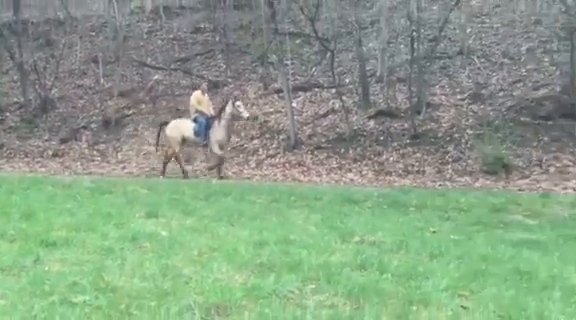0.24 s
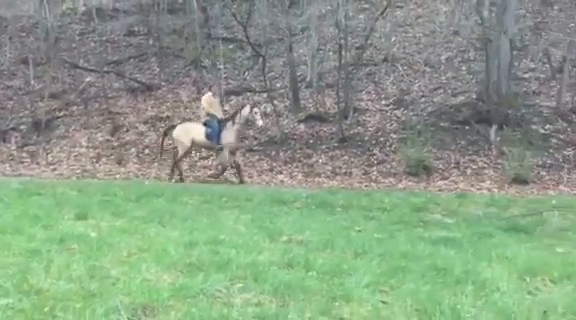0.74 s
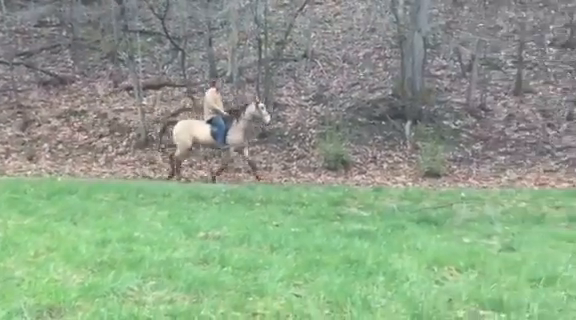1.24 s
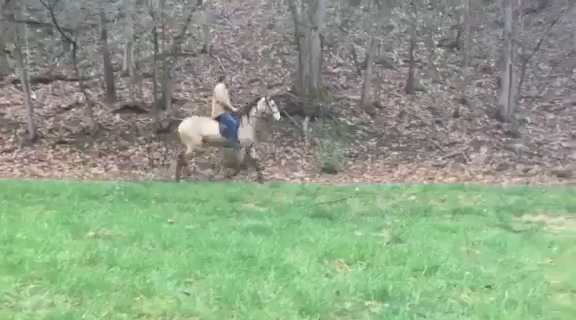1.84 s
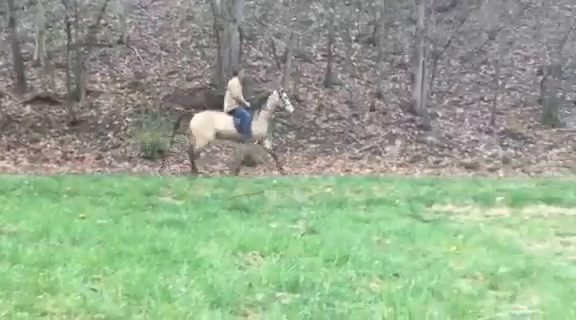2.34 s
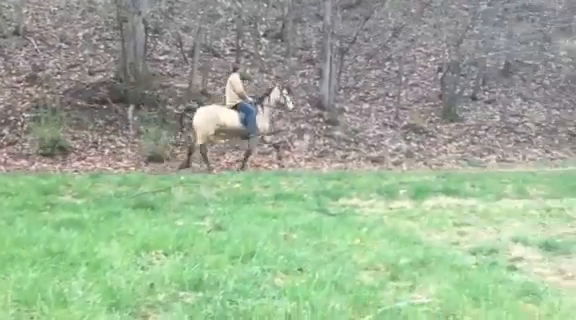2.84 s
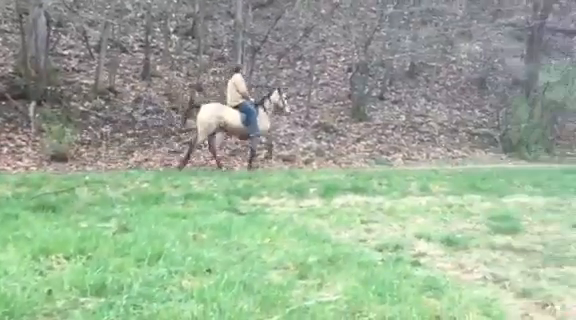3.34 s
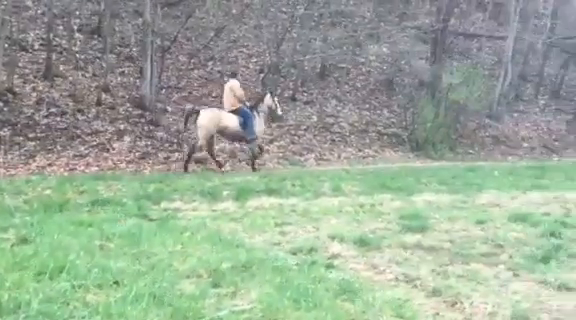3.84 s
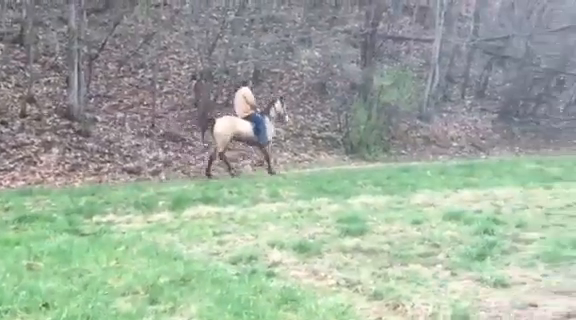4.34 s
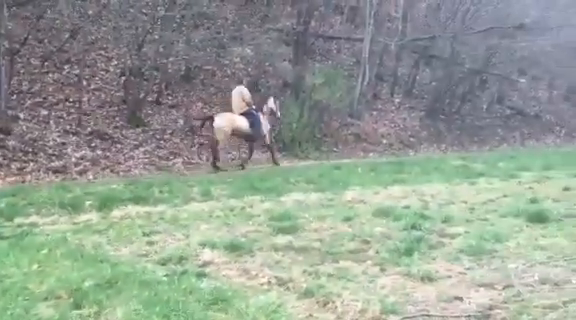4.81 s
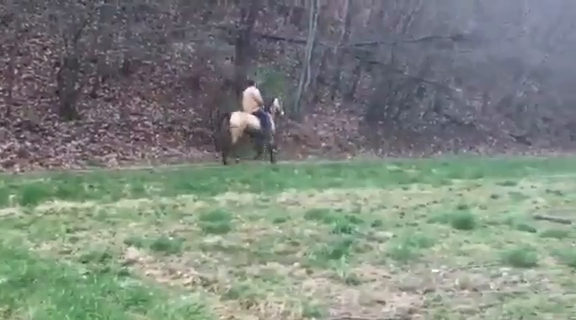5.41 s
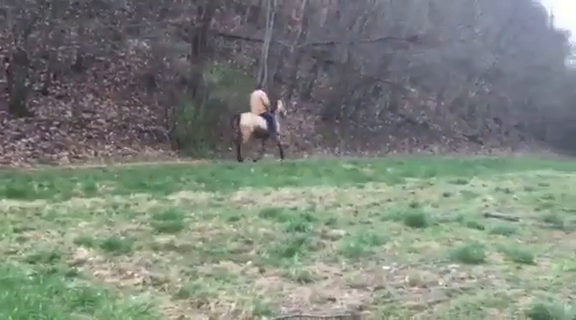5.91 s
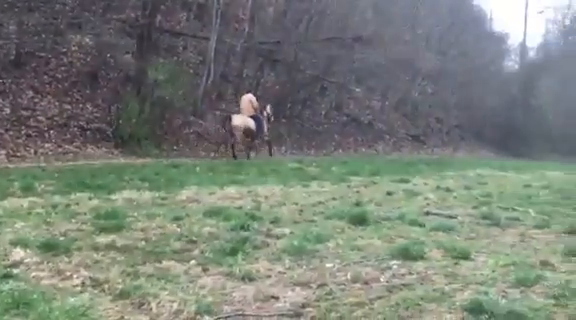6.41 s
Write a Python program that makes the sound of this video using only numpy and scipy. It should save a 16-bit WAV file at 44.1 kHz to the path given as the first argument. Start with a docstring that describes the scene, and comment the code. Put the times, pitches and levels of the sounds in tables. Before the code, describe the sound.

Across an open meadow, a horse's hooves step briskly along a leafy dirt trail: crisp snaps and crunches, soft stony clops, dull soil thumps and small pebble knocks. Quiet woods hiss and murmur behind. Wind is barely noticeable at first, then from the middle it hits the microphone with deep, fluttering buffets, while the steps grow duller as the horse moves away. Mono, distant outdoor pickup.

```python
"""Hooves tread a leaf-strewn dirt trail some way off across a meadow, from the start and all through.
Leaves snap and crunch as coloured noise and tiny ticks; stones clop, low thumps and pebbles knock as
short two-mode rings with a noisy scuff. Over the steps the top treble thins as the horse draws away.
Faint gusts brush the microphone from the start and buffet it strongly from halfway: low resonant
noise, flutter, slaps, thumps. Woods murmur and hiss throughout: filtered noise with a faint whine."""
import sys
import numpy as np
from scipy import signal
from scipy.io import wavfile
from scipy.ndimage import uniform_filter1d

SR = 44100
rng = np.random.default_rng(int(sys.argv[2]) if len(sys.argv) > 2 else 0)


def int16_out(signal):
    """Quantize to a 16-bit WAV file."""
    q = np.round(np.clip(np.atleast_2d(signal).T, -1, 1) * 32767)
    wavfile.write(sys.argv[1], SR, q.astype(np.int16))


N = 293706


CRUNCH_RISE_S = 0.0047
LITTER_HZ, LITTER_SPREAD = 3070, 0.15  # median patch resonance; spread in log Hz
FADE_DB_PER_S = 2  # top treble loss as the horse draws away

# Hooves crushing leaves. Each row: start in seconds, snap level in dB and crunch level in dB before
# the band gains, crunch length in seconds, middle treble gain in dB, top treble gain in dB before the fade.
CRUNCHES = [(.046, -25.5, -41, 0.061, -4, -15), (0.17, -38, -43.5, 0.031, -6, -11),
            (0.327, -40, -50.5, .016, -8, -13), (.381, -44.5, -54, 0.019, 6.5, 6.5),
            (0.448, -45, -44, .028, -14, -26), (0.609, -68, -52.5, .045, -1.5, -8),
            (0.701, -59, -54.5, 0.041, -5, -13), (.875, -61, -51, 0.015, 0, -9),
            (.915, -50, -60.5, 0.074, 5.5, 1), (.946, -20.5, -42.5, 0.038, 1, -15),
            (.999, -34, -50.5, 0.038, -15, -27), (1.106, -59, -55, 0.0086, 6.5, 8.5),
            (1.175, -38.5, -54, 0.028, -3.5, -19), (1.272, -56, -55.5, 0.03, -3, -11),
            (1.284, -36, -54.5, 0.028, -4, -4.5), (1.417, -52, -41.5, 0.019, -1.5, -6),
            (1.438, -50, -54, .037, 7, 4), (1.477, -35.5, -60, 0.02, -1, -15),
            (1.561, -60, -56.5, 0.022, -3.5, -2), (1.682, -74, -58.5, 0.0071, -1, 6),
            (1.707, -67, -57, 0.14, 0, -6), (1.765, -23.5, -46, 0.05, -4.5, -2.5),
            (1.828, -55, -57, 0.021, -8, -10), (1.978, -31.5, -44.5, 0.042, -2, -1),
            (2.011, -31.5, -47.5, 0.013, -11, 1), (2.13, -51, -53, 0.041, 0.5, -4),
            (2.173, -60, -51, .019, -20, -22), (2.25, -27.5, -40.5, 0.036, -1, -16),
            (2.362, -36, -44, 0.038, -2, -5), (2.53, -38, -49.5, 0.031, -4.5, -1),
            (2.598, -37.5, -50.5, 0.034, -0.5, 0), (2.633, -37, -43, 0.035, -2.5, -5),
            (2.653, -34, -49, 0.028, -4, -4), (2.796, -36.5, -44, 0.028, -1.5, 0.5),
            (2.816, -50, -54, 0.029, -3, 7), (2.923, -46, -45.5, 0.027, -1.5, -26),
            (3.073, -67, -54.5, 0.029, 3, -25), (3.082, -27.5, -49.5, 0.024, -13.5, -29),
            (3.201, -58, -48, 0.023, -9, -12), (3.305, -72, -64, .014, -8, -16),
            (3.349, -69, -52.5, 0.016, 5, -1), (3.488, -31, -46.5, 0.022, 3.5, -8),
            (3.672, -82, -53, 0.02, -32, -24), (3.729, -47, -63.5, 0.034, 9.5, 13.5),
            (3.755, -47, -52, 0.023, -13, -2), (3.876, -71, -62, .015, -11, -10),
            (3.917, -73, -53, 0.011, -1, 6), (4.024, -36, -44, 0.019, -6, -12),
            (4.13, -51, -59, 0.032, -21, -22), (4.165, -62, -53, 0.02, -14, -16),
            (4.254, -42.5, -63, 0.047, -2.5, 4), (4.307, -31.5, -45.5, 0.025, -12, -5.5),
            (4.439, -74, -54, 0.036, -10, -16), (4.449, -38, -66, .023, -5, -17),
            (4.671, -66.5, -49, 0.018, -35, -30), (4.709, -67, -40, .016, -26, -6),
            (4.733, -42, -62, 0.086, 5, 10), (4.769, -29.5, -42, 0.02, -14, -27),
            (4.789, -40, -55, 0.033, 4, 7), (4.971, -65, -49, 0.032, -16, -13),
            (4.988, -36.5, -55, 0.027, 2.5, -16), (5.04, -59, -59, .024, -26, -27),
            (5.106, -44, -49, 0.03, -6, -11), (5.115, -57, -56, .017, -18, -20),
            (5.254, -60, -62, .042, -8, -20), (5.266, -29.5, -45, .046, -12.5, -10),
            (5.318, -48, -56, 0.04, 9, 7), (5.335, -41.5, -52, 0.014, -7, 0),
            (5.394, -56, -56, 0.019, -12, -11), (5.51, -60, -67, 0.021, -22, -20),
            (5.54, -69, -61, 0.038, -6, -18), (5.614, -36, -54.5, 0.031, -8, -23),
            (5.655, -57, -53, 0.038, -0.5, -5), (5.813, -26.5, -46.5, 0.032, -7.5, -11),
            (5.941, -55, -50, 0.033, -2.5, -7), (5.963, -30, -57, 0.023, -9, -28),
            (6.085, -60, -52, 0.025, -17, -32), (6.097, -27.5, -44.5, 0.069, -4, -22),
            (6.371, -26, -46.5, 0.043, -5, -27), (6.498, -65, -54, 0.027, -13, 1)]


def leaves(tail_db=-17, tail_s=0.065, colour_db=-4.0):
    """A crack and short snap, then a bed of tiny fractures that lasts while the hoof presses down."""
    clumps = gain_of(3 * drift(120))
    rustle = evened(patchy(rng.standard_normal(N), 3.5) * clumps)
    ticks = fractures(per_s=1200, spread_db=6.5, width_hz=330)
    grit = three_bands(evened(rustle + 0.42 * ticks))
    splinter = three_bands(steadied(rng.standard_normal(N), .0005))
    out, t = np.zeros(N), np.arange(SR // 3) / SR
    crack = np.exp(-(t / .0004) ** 2)
    snap = crack + .45 * np.tanh(t / .001) * np.exp(-(t / .0045) ** 2)
    patch_hz = LITTER_HZ * np.exp(LITTER_SPREAD * rng.standard_normal((len(CRUNCHES), 1)))
    for (s, snap_db, crunch_db, length_s, middle_db, top_db), hz in zip(CRUNCHES, patch_hz):
        press = np.exp(-(t / max(length_s, .004)) ** 1.48)
        press += gain_of(tail_db) * np.exp(-t / tail_s)  # leaves settle afterwards
        press *= gain_of(crunch_db) * np.tanh(t / CRUNCH_RISE_S)
        at = slice(round(s * SR), round(s * SR) + len(t))
        snapped = band(gain_of(snap_db) * snap * splinter[:, at], 1140, "high")
        low, middle, top = snapped + press * grit[:, at]
        litter = low + gain_of(middle_db) * middle + gain_of(top_db - FADE_DB_PER_S * s) * top
        patch = resonate(low + middle, hz, width_hz=750)
        add(out, s, litter + gain_of(colour_db) * patch)
    return out


def fractures(per_s, spread_db, width_hz):
    """Tiny breaks of very different sizes, each leaf shard ticking at one of 12 pitches."""
    breaks = rng.random(N) < per_s / SR
    sizes = gain_of(spread_db * np.minimum(rng.exponential(1, N), 4)) * breaks
    shard, pitches_hz = rng.integers(0, 12, N), np.geomspace(1500, 14000, 12)
    total = np.zeros(N)
    for k, hz in enumerate(pitches_hz):
        total += evened(resonate(sizes * (shard == k), hz, width_hz)) * np.sqrt(hz)
    return evened(total)


# Leaf litter spectrum. Each row: frequency in Hz, density in dB per Hz.
LITTER_SPECTRUM = [(500, -24), (900, -50), (1300, -8), (1950, -2), (2500, 1), (3200, 3.5), (4100, 1.5),
                   (6000, 4.5), (8900, 7.5), (10500, 4.5), (11600, 8.5), (15500, 7.5)]


def three_bands(x):
    """Colours x as leaf litter and splits it at 4500 and 9000 Hz: low, middle and top treble."""
    x = coloured(x, LITTER_SPECTRUM)
    under_low, under_top = smooth_low(x, 4500), smooth_low(x, 9000)
    bands = [under_low, under_top - under_low, x - under_top]
    return np.pad(bands, ((0, 0), (0, SR)), "wrap")  # spare second for late events


# Hoof wall on stones. Each row: start in seconds, level in dB, ring in Hz,
# scuff against the level in dB, time to the force peak in seconds.
CLOPS = [(0.04, -47.5, 1693, -10, 0.0038), (0.168, -54.5, 1400, -1.5, 0.0056),
         (0.278, -53, 1073, -27, 0.0055), (0.326, -59.5, 1020, -3.5, 0.0036),
         (0.792, -58, 980, -6.5, 0.0054), (1.275, -56, 870, -4.5, 0.0029), (1.417, -52, 1490, -7.5, 0.0051),
         (1.647, -50, 1095, -8, 0.0051), (1.673, -58, 1080, -6, 0.0043), (1.766, -53.5, 1920, -11, 0.0054),
         (1.831, -59.5, 1010, 1.5, 0.0026), (1.941, -58.5, 970, -29, 0.0033),
         (1.982, -52, 1250, -7, 0.0037), (2.143, -57, 870, 0, 0.0043), (2.185, -48, 1600, -11, 0.0027),
         (2.246, -50.5, 1492, -12, 0.0075), (2.317, -55.5, 1060, -7, 0.0036),
         (2.35, -56.5, 1140, 2, 0.0025), (2.534, -52.5, 990, -2, 0.0024), (2.601, -56, 1660, -3, 0.0039),
         (2.63, -54.5, 1360, 2, 0.0025), (2.793, -51, 1670, -5, 0.0074), (2.925, -50, 1300, -2.5, 0.0043),
         (3.073, -53, 1260, -6, 0.0043), (3.203, -49.5, 1040, -8, 0.0045), (3.316, -52.5, 1215, -9, 0.0053),
         (3.491, -53, 965, -2.5, 0.0035), (3.763, -58, 1504, 1, 0.0048), (3.917, -46.5, 1516, -16, 0.0057),
         (4.025, -53, 1165, -3.5, 0.0039), (4.136, -44.5, 1030, -10, 0.0046),
         (4.311, -55.5, 1000, 1, 0.0047), (4.446, -49.5, 1240, -11, 0.0041), (4.667, -52, 1076, -7, 0.0055),
         (4.71, -48, 1176, -20, 0.0041), (4.852, -56.5, 1250, -6, 0.0043), (4.949, -54, 1016, -19, 0.0046),
         (4.985, -58, 1124, -15, 0.005), (5.034, -58.5, 1630, -11, 0.0047), (5.111, -49, 1302, -6, 0.0055),
         (5.211, -55.5, 1087, -11, 0.0048), (5.268, -43, 1380, -14.5, 0.0035),
         (5.332, -55, 1716, -13, 0.0057), (5.496, -46, 1124, -15, 0.0056), (5.667, -55, 1316, -4.5, 0.0054),
         (5.956, -57.5, 1400, -9, 0.0067), (6.368, -45.5, 1555, -13, 0.0047)]


def clops():
    """Stone blows: the second mode lies close above the first."""
    return knocks(CLOPS, rough=0.27, scuff_s=0.033, second=1.3, second_db=-10)


# Low thumps: hooves on soil, and from 3.9 s, those under 260 Hz, wind buffets on the microphone.
# Each row: start in seconds, level in dB, ring in Hz,
# scuff against the level in dB, time to the force peak in seconds.
THUMPS = [(0.043, -51.5, 258, -10, 0.0038), (0.119, -44, 331, -20, 0.0034),
          (0.167, -50.5, 254, -13, 0.0045), (0.275, -55, 564, -14, 0.004), (0.412, -48.5, 344, -18, 0.0054),
          (0.515, -57, 248, -10, 0.0033), (0.623, -40.5, 279, -23, 0.0038),
          (0.661, -50.5, 370, -17, 0.0039), (0.876, -55, 640, -7, 0.004), (0.914, -45.5, 518, -23, 0.0025),
          (1.175, -51, 340, -12, 0.0054), (1.3, -57, 700, -16, 0.0036), (1.418, -51.5, 576, -12, 0.0022),
          (1.586, -56.5, 575, -12, 0.0046), (1.647, -49, 670, -13, 0.0026), (1.672, -47, 520, -21, 0.0024),
          (1.763, -50.5, 616, -16.5, 0.004), (1.843, -56.5, 525, -16, 0.0051),
          (1.996, -53.5, 644, -23, 0.0036), (2.04, -58, 245, -18, 0.0064), (2.143, -48, 406, -18, 0.0029),
          (2.185, -41, 362, -14.5, 0.0036), (2.261, -54, 240, -18, 0.0032), (2.314, -48, 311, -10, 0.0042),
          (2.549, -49.5, 620, -9, 0.0019), (2.581, -49, 275, -16, 0.0033), (2.612, -44, 353, -14, 0.0032),
          (3.059, -42.5, 248, -14.5, 0.0018), (3.373, -45, 221, -28, 0.0038),
          (3.483, -45, 369, -19, 0.0028), (3.633, -51.5, 571, -13, 0.0036),
          (3.782, -51.5, 406, -18, 0.0043), (3.91, -35.5, 251, -12, 0.0042), (4.057, -49, 234, -13, 0.0026),
          (4.574, -41, 226, -14, 0.0037), (4.864, -55.5, 610, -23, 0.0031),
          (5.043, -39.5, 244, -16, 0.0024), (5.11, -40, 232, -16, 0.0035), (5.282, -43.5, 248, -23, 0.0027),
          (5.812, -48.5, 223, -12, 0.0021), (6.103, -45, 253, -12, 0.0046),
          (6.366, -35.5, 232, -16.5, 0.0047)]


def thumps():
    """Soil blows and late wind buffets: low pitches with a second mode near the octave."""
    return knocks(THUMPS, rough=0.3, scuff_s=0.038, second=1.985, second_db=-11)


PEBBLES_PER_S, PEBBLE_DB, PEBBLE_HZ = 9, -66, 798  # mean level, median pitch


def pebbles(spread_db=2.5, hz_spread=0.298):
    """Small stones kicked about at random times, sizes and pitches (spread in log Hz)."""
    when_s = rng.random(round(PEBBLES_PER_S * N / SR)) * N / SR
    size, pitch = rng.standard_normal((len(when_s), 2)).T
    rows = []
    for s, a, b in zip(when_s, size, pitch):
        rows.append((s, PEBBLE_DB + spread_db * a, PEBBLE_HZ * np.exp(hz_spread * b), -9, .0035))
    return knocks(rows, rough=0.46, scuff_s=0.029, second=1.8, second_db=-15)


def knocks(events, rough, scuff_s, second, second_db):
    """A soft two-mode blow, partly noisy, with a longer noisy scuff; second is the mode ratio."""
    out, t = np.zeros(N), np.arange(SR // 6) / SR
    chance = rng.standard_normal((len(events), 2, len(t)))
    for (s, db, hz, scuff_db, peak_s), (jitter, dirt) in zip(events, chance):
        u = t / max(peak_s, .001)
        force = gain_of(db) * u ** 2 * np.exp(2 - 2 * u)  # swells and ebbs
        ring = np.sin(2 * np.pi * hz * t)
        ring += gain_of(second_db) * np.sin(2 * np.pi * second * hz * t)
        ring += rough * evened(resonate(jitter, hz, hz / 2))
        once = resonate(dirt, 0.91 * hz, 0.77 * hz)
        scuff = evened(resonate(once, 0.91 * hz, 0.77 * hz))
        scuff_shape = np.tanh(t / 0.0095) * np.exp(-(t / scuff_s) ** 2)
        add(out, s, force * ring + gain_of(db + scuff_db) * scuff * scuff_shape)
    return out


BUFFET_HZ, FLUTTER_DB = 95, -15.5  # steady wind: buffeting pitch; flutter against the level

# Steady wind at the microphone. Each row: time in seconds, level in dB before the random unrest.
WIND = [(0, -75), (1.5, -76), (2.3, -72.5), (3.3, -71), (3.7, -63.5), (3.95, -38.5), (4.4, -44),
        (4.75, -52), (5.12, -52), (5.2, -59), (5.3, -54), (5.9, -48), (6.2, -55), (6.66, -42.5)]
# Gusts on top of it, faint at first. Each row: peak in seconds, level in dB, buffeting pitch in Hz,
# flutter against the level in dB, half length to 1/e in seconds.
GUSTS = [(0.186, -70, 145, -15, 0.033), (.63, -63, 174, 4, 0.024), (0.813, -57.5, 70, -10, 0.022),
         (.97, -71.5, 75, -8, 0.096), (1.303, -69, 147, 2, 0.02), (1.439, -70, 166, 7, 0.026),
         (1.71, -69, 85, 2.5, 0.054), (2.186, -60, 104, -5, 0.027), (2.41, -70, 70.4, -0.5, 0.11),
         (2.801, -71.5, 139, 9.5, 0.071), (2.949, -61, 167, 5, 0.023), (3.067, -66.5, 97, -0.5, 0.032),
         (3.22, -62.5, 67, -1.5, 0.035), (3.37, -52.5, 98, -5.5, 0.038), (3.495, -50.5, 85, -5.5, 0.03),
         (3.645, -54.5, 107, -1.5, 0.031), (3.764, -50.5, 75, -32.5, .04), (3.834, -45.5, 108, -10, 0.018),
         (3.919, -25.5, 134, -9, 0.022), (4.018, -39.5, 92, -28, 0.028), (4.101, -35.5, 117, -7.5, 0.015),
         (4.171, -38.5, 85.5, -3.5, 0.035), (4.301, -46, 87.5, -13, .03), (4.42, -40.5, 101, -17, 0.04),
         (4.5, -42, 108, -14, 0.045), (4.564, -44.5, 84.4, -9, .04), (4.672, -49.5, 138, -8.5, 0.046),
         (4.8, -48.5, 78, -11, 0.031), (4.898, -42.5, 79, -37, 0.032), (5.072, -50.5, 88.5, -15, .04),
         (5.143, -50.5, 71.6, -16, 0.02), (5.362, -47, 73, -20, 0.05), (5.568, -44.5, 95, -10, 0.031),
         (5.666, -42.5, 79.6, -31, 0.026), (5.719, -42.5, 70, -35, 0.018), (5.884, -41.5, 71.6, -25, 0.027),
         (6.05, -51, 96, -11, .05), (6.145, -45, 84, -8, 0.051), (6.234, -42, 108, 0, 0.033),
         (6.346, -38.5, 83, -6.5, 0.031), (6.419, -40.5, 90, -15, 0.02), (6.536, -39, 138, -6.5, 0.039),
         (6.635, -44, 117, -7, 0.057)]
# Microphone's reach for large eddies. Each row: frequency in Hz, density in dB per Hz.
BUFFET_SPECTRUM = [(15, -47.5), (30, -12.5), (50, 9), (100, -0.5), (200, -9.5), (300, -29.5), (500, -48)]
# Small eddies. Each row: frequency in Hz, density in dB per Hz.
FLUTTER_SPECTRUM = [(90, -41), (150, -4.5), (200, -3.5), (280, -13), (340, -15), (450, -30.5), (700, -51),
                    (900, -76.5)]


def wind(lumps_db=5.0, unrest_db=-1.0):
    """Eddies breaking on the microphone: low noise in gusts of their own pitch, and lumpy flutter."""
    t = np.arange(N) / SR
    level = gain_of(curve(WIND)[0] + unrest_db * drift(3.8))
    pitch_sum, flutter = level * BUFFET_HZ, level * gain_of(FLUTTER_DB)
    for s, db, hz, flutter_db, half_s in GUSTS:
        swell = gain_of(db) * np.exp(-((t - s) / max(half_s, .01)) ** 2)
        level = level + swell
        pitch_sum = pitch_sum + swell * hz
        flutter = flutter + swell * gain_of(flutter_db)
    pitch_hz = pitch_sum / level  # level-weighted mean
    eddies = resonate(rng.standard_normal(N), pitch_hz, width_hz=76)
    eddies = resonate(eddies, pitch_hz, width_hz=109)
    low = steadied(coloured(eddies, BUFFET_SPECTRUM), 0.0566)
    lumps = rng.standard_normal(N) * gain_of(lumps_db * drift(29))
    high = evened(coloured(lumps, FLUTTER_SPECTRUM))
    return level * low + flutter * high


# Single eddies. Each row: start in seconds, level in dB, pitch in Hz,
# rush after it against the level in dB, time to the force peak in seconds.
SLAPS = [(2.799, -47.5, 143, -14, 0.0067), (2.936, -47.5, 174, -24, 0.0075), (3.368, -46, 162, -18, .006),
         (3.485, -55, 103, -22, 0.0038), (3.765, -46, 127, -22, .007), (3.814, -37.5, 134, -17, 0.0063),
         (3.908, -31, 140, -28, .0065), (4.27, -39, 164, -26, 0.007), (4.397, -34, 102.5, -18, 0.011),
         (5.041, -50, 103, -18, 0.0035), (5.104, -38.5, 113, -23, .008), (5.28, -44.5, 122, -22, .007),
         (5.407, -39, 100, -18, 0.0046), (5.546, -30.5, 110, -24, 0.0055), (5.707, -45, 126, -19, 0.0068),
         (5.97, -39.5, 112, -11, 0.0054), (6.037, -35, 102, -28, 0.0063), (6.212, -42.5, 224, -9, 0.011),
         (6.296, -39, 121, -31, 0.0072), (6.366, -26, 146, -30, .006), (6.515, -35.5, 163, -26, .008),
         (6.562, -38, 128, -24, 0.0076)]


def slaps():
    """Single eddies slapping the microphone: low, nearly pure blows with a short rush."""
    return knocks(SLAPS, rough=0.041, scuff_s=0.024, second=1.886, second_db=-16)


# Woods spectrum. Each row: frequency in Hz, density in dB per Hz.
WOODS_SPECTRUM = [(59, -14), (100, -8), (231, -2), (352, -6.5), (594, 2), (831, -5), (983, -0.5),
                  (1590, -5), (1840, -6), (3610, -6.5), (7670, -11), (8520, -9.5), (13500, -17.5),
                  (15000, -15)]
# Woods loudness before random drift. Each row: time in seconds, hiss level in dB, low murmur level in dB.
WOODS_LEVEL = [(0, -67, -70), (.1, -63, -69), (.8, -73, -71), (1.5, -72, -71), (2.4, -68.5, -68.5),
               (2.9, -71, -69.5), (3.4, -72, -70.5), (4.2, -73.5, -73), (5.1, -72.5, -72), (6, -72.5, -75),
               (6.66, -70, -73)]


def woods():
    """Far rustle and hiss split at 1900 Hz, with a faint narrow whine that comes and goes."""
    hiss_db, murmur_db = curve(WOODS_LEVEL)
    air = coloured(patchy(rng.standard_normal(N), 2.5), WOODS_SPECTRUM)
    murmur = smooth_low(air, 1900)
    whine_spectrum = [(1250, -50), (1580, -5), (1700, 0), (1820, -5), (2150, -50)]  # Hz, dB per Hz
    whine = coloured(rng.standard_normal(N), whine_spectrum)
    flicker_db, waver_db = 4 * drift(12), 2 * drift(20)
    out = gain_of(hiss_db + 0.57 * drift(20.0)) * evened(air - murmur)
    out += gain_of(murmur_db + waver_db) * evened(murmur)
    return out + gain_of(-79.5 + flicker_db) * whine


def gain_of(db):
    """Decibels to gain."""
    return 10 ** (np.asarray(db) / 20)


def evened(x):
    """Scales to rms 1."""
    return x / np.sqrt(np.mean(x ** 2) + 1e-20)


def steadied(x, s):
    """Evens out swells slower than s seconds."""
    power = uniform_filter1d(x ** 2, round(s * SR))
    return evened(x / np.sqrt(power + 0.39 * np.mean(x ** 2)))


def coloured(x, points):
    """Gives x a spectrum with a causal (minimum-phase) filter of energy 1."""
    f, db = np.transpose(points)
    hz = abs(np.fft.fftfreq(8192, 1 / SR))
    shape_db = np.interp(np.log(hz + 1), np.log(f + 1), db)
    log_gain = np.log(gain_of(np.maximum(shape_db, -100)))
    taps = np.fft.ifft(np.exp(np.conj(signal.hilbert(log_gain)))).real[:4096]
    return signal.oaconvolve(x, taps / np.linalg.norm(taps))[:N]


def resonate(x, hz, width_hz):
    """Resonance of gain 1 that follows hz: shift to zero, one-pole low-pass, shift back."""
    turn = np.exp(2j * np.pi * np.cumsum(hz * np.ones(len(x))) / SR)
    r = np.exp(-np.pi * width_hz / SR)
    return 2 * (turn * signal.lfilter([1 - r], [1, -r], x / turn)).real


def patchy(x, depth_db):
    """Random brighter and darker patches, about 430 Hz by 23 ms."""
    z = signal.stft(x, nperseg=512, noverlap=384)[2]
    patches = uniform_filter1d(rng.standard_normal(z.shape), size=5, axis=0)
    patches = uniform_filter1d(patches, size=8, axis=1)
    z = z * gain_of(depth_db * evened(patches))
    return evened(signal.istft(z, nperseg=512, noverlap=384)[1][:N])


def band(x, hz, kind):
    """Gentle low- or high-pass."""
    return signal.sosfilt(signal.butter(2, hz, kind, fs=SR, output="sos"), x)


def smooth_low(x, hz):
    """Low-pass without delay."""
    return signal.sosfiltfilt(signal.butter(3, hz, fs=SR, output="sos"), x)


def drift(hz):
    """Slow random curve of rms 1, low-passed at hz."""
    return evened(band(rng.standard_normal(N), hz, "low"))


def curve(rows):
    """Table columns at every sample."""
    s, *columns = np.transpose(rows)
    return [np.interp(np.arange(N) / SR, s, c) for c in columns]


def add(mix, s, sound):
    """Mixes sound in from time s."""
    part = mix[round(s * SR):][:len(sound)]
    part += sound[:len(part)]


def scene():
    """Hooves, wind and woods in one channel."""
    steps = leaves() + clops() + pebbles()
    return (steps + thumps() + wind() + slaps() + woods())[None]


EDGE_HZ = 15150


def record(dry):
    """The band limit of the recorder."""
    low_pass = signal.firwin(301, EDGE_HZ, window=("kaiser", 9), fs=SR)
    return signal.oaconvolve(dry, low_pass[None], "same")


dry = scene()
out = record(dry)
int16_out(out)
```